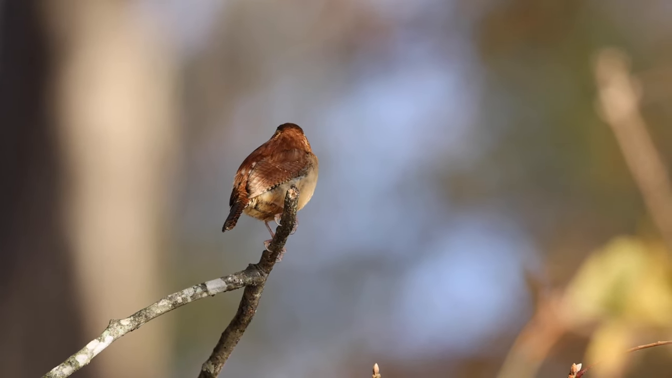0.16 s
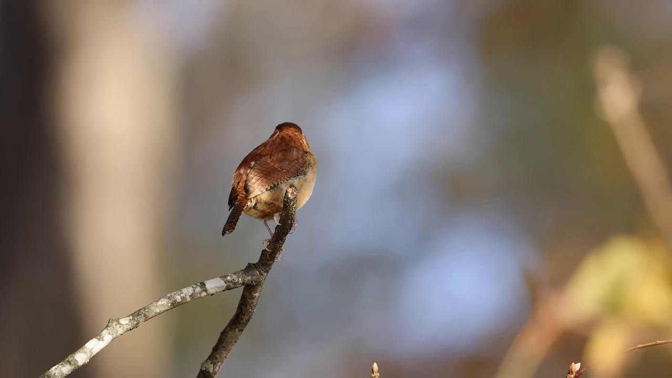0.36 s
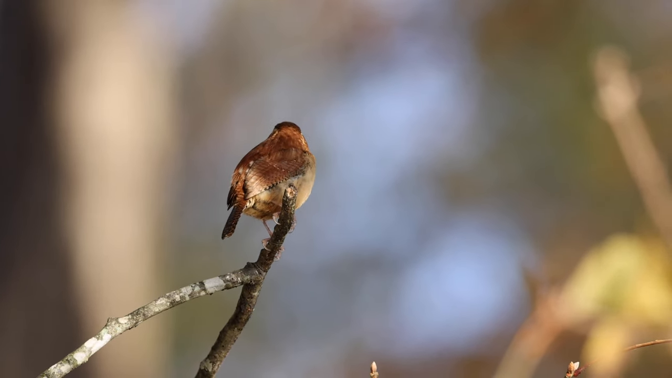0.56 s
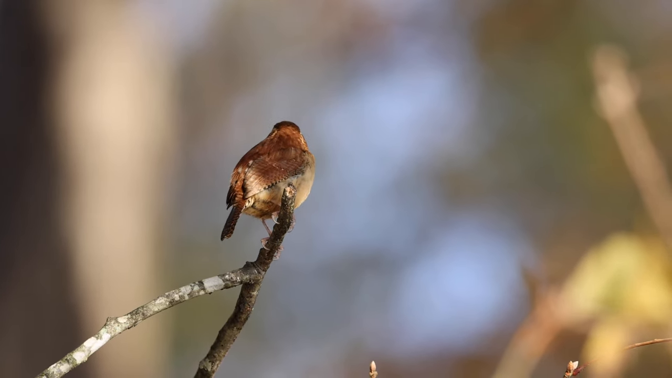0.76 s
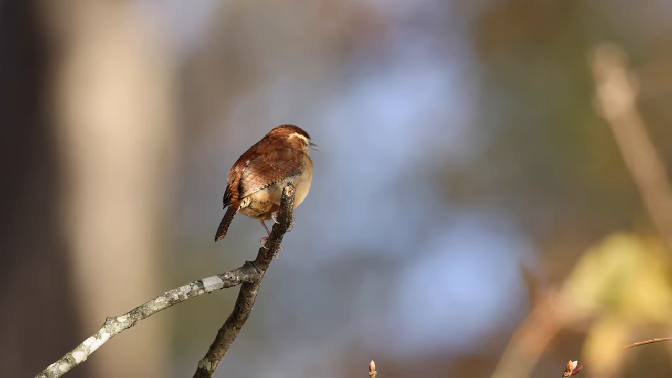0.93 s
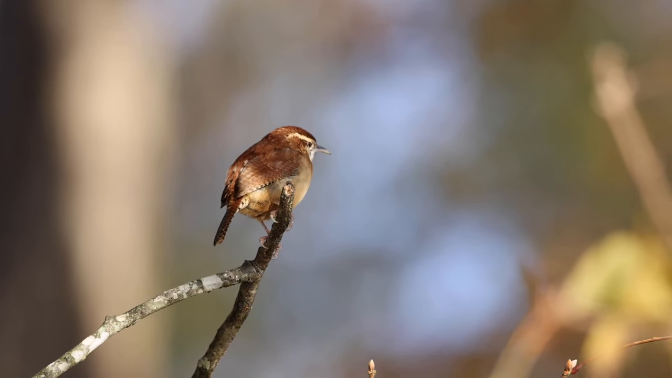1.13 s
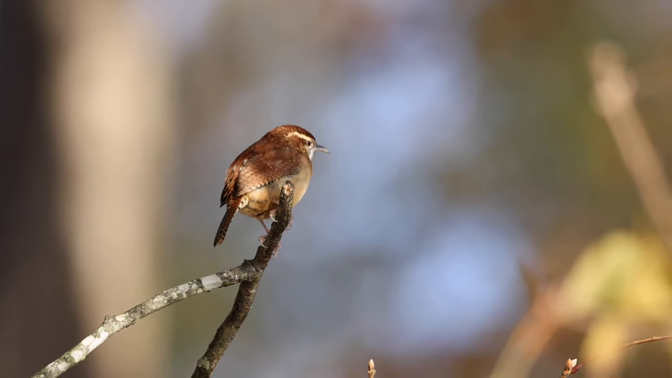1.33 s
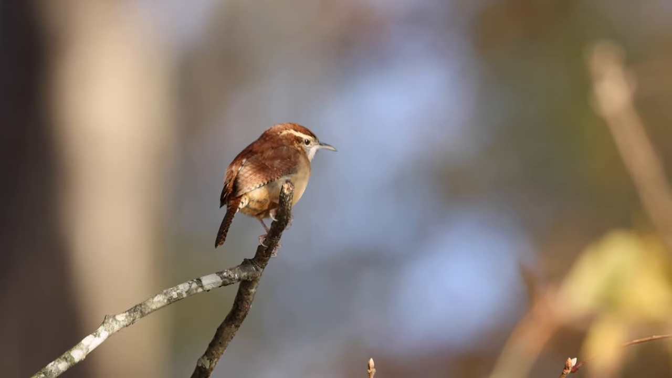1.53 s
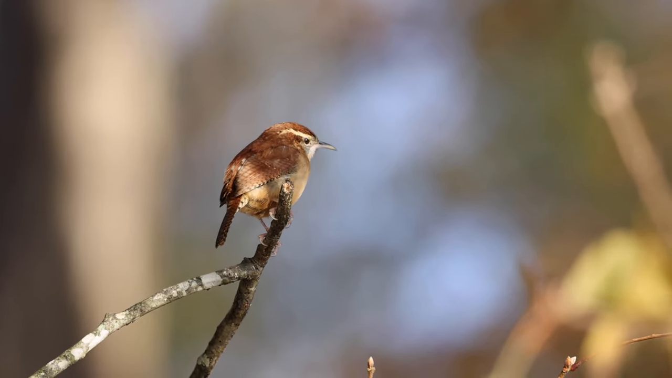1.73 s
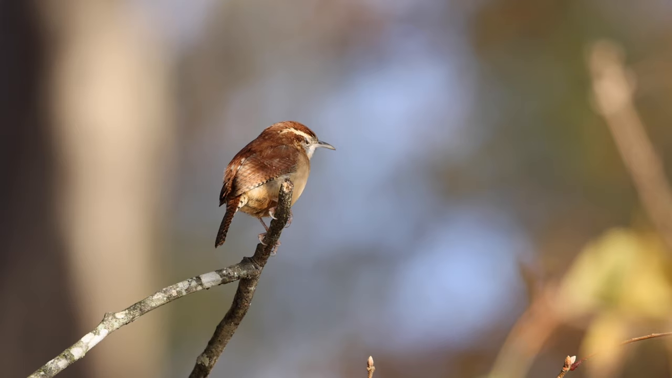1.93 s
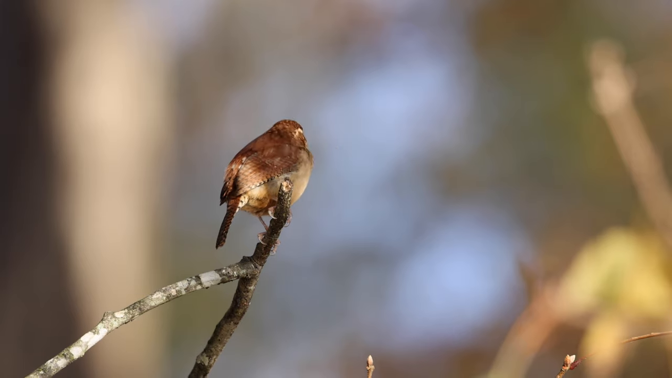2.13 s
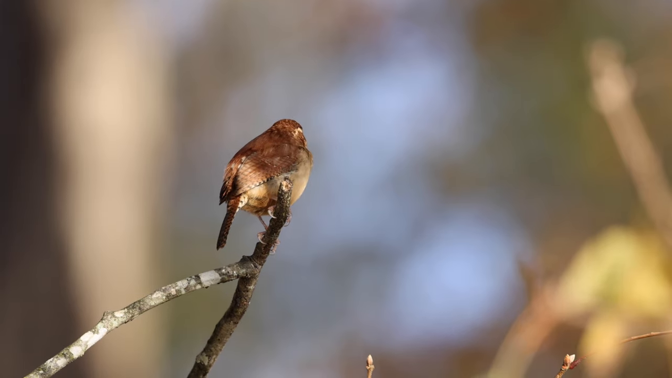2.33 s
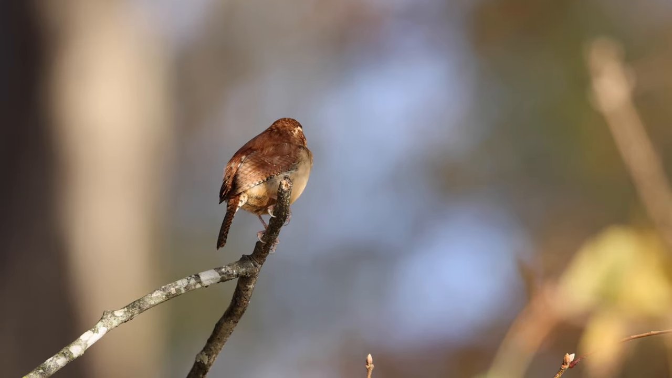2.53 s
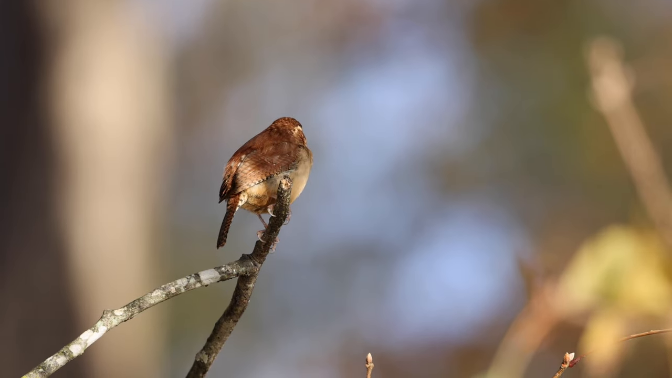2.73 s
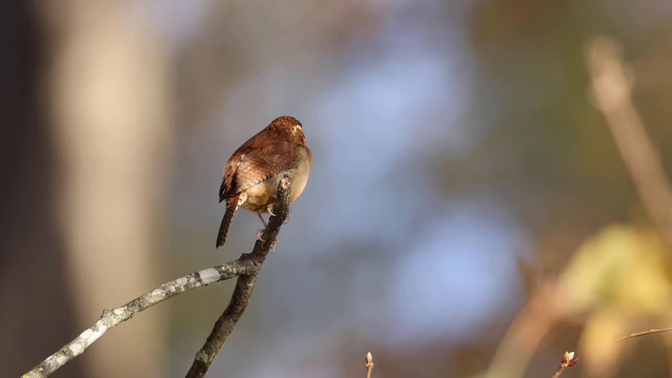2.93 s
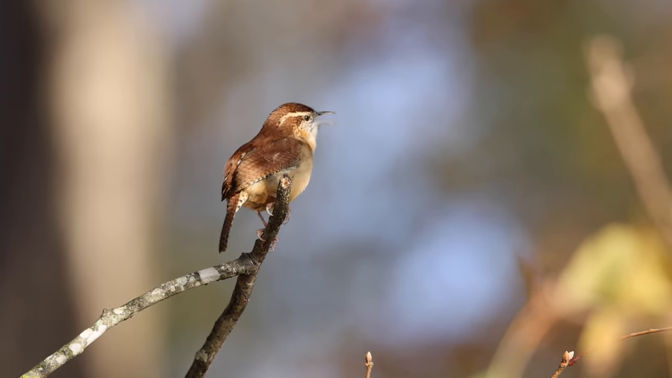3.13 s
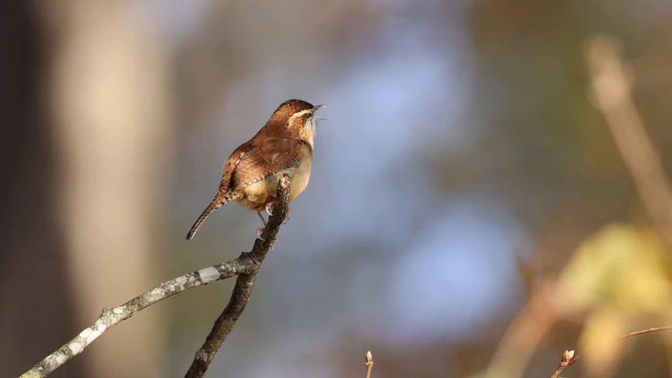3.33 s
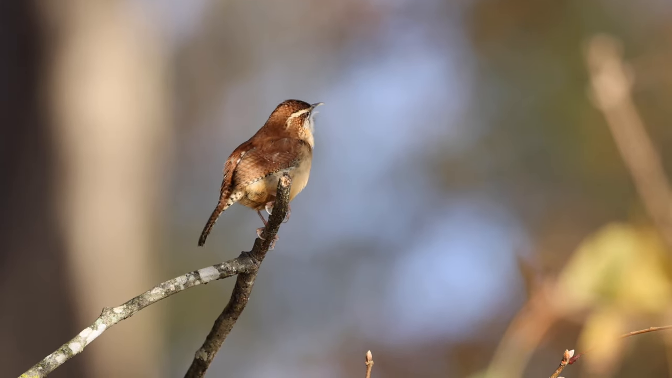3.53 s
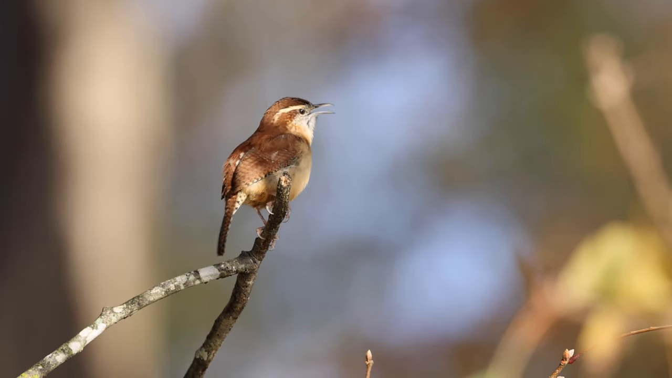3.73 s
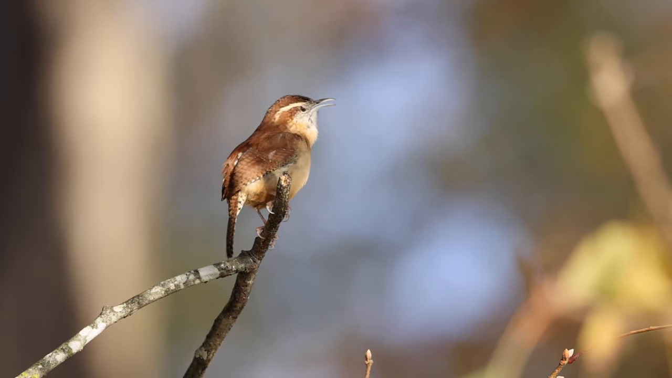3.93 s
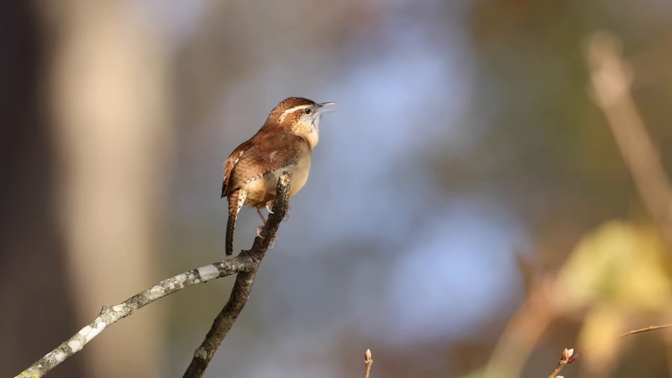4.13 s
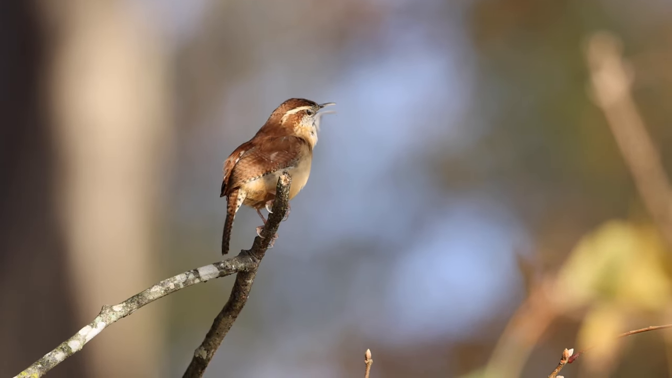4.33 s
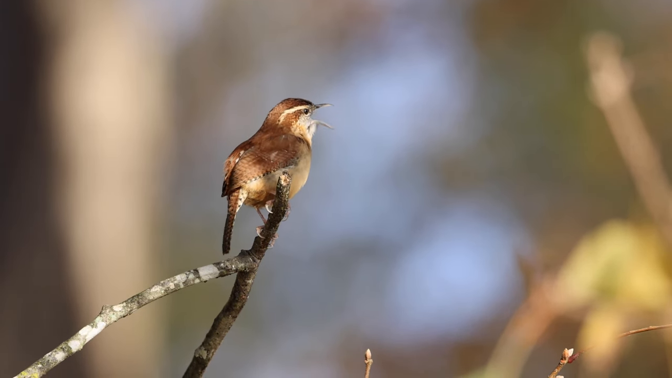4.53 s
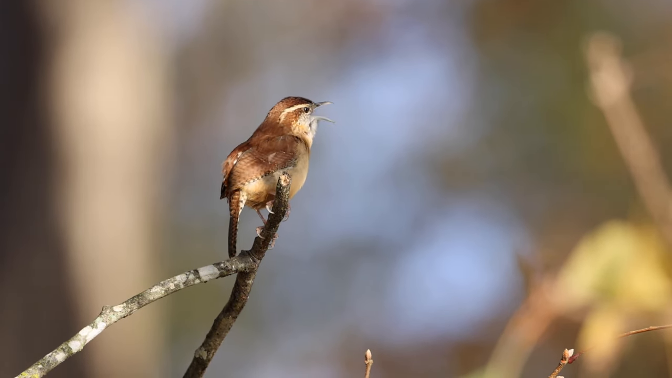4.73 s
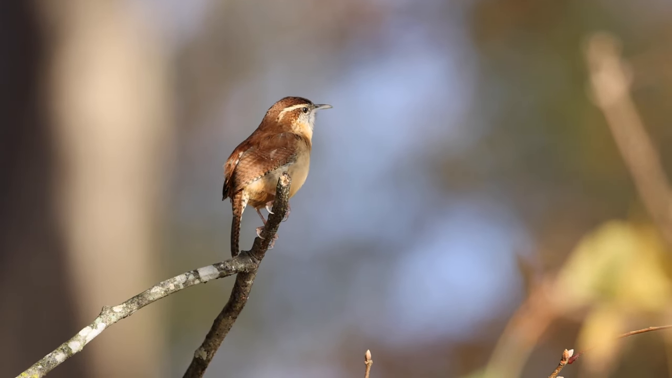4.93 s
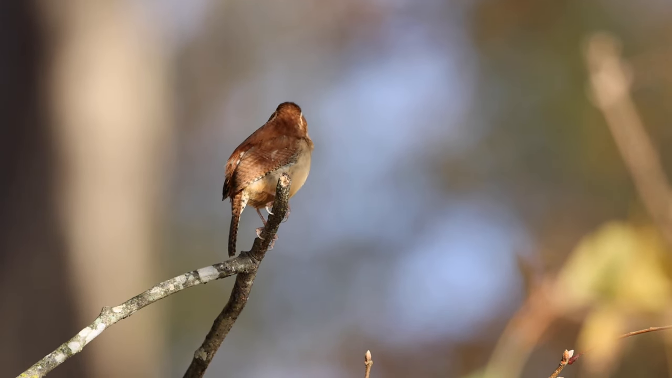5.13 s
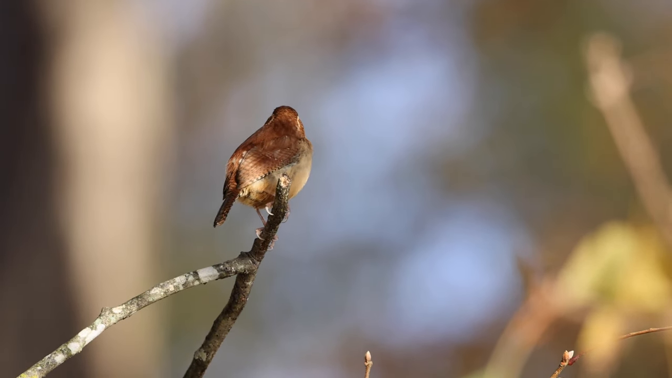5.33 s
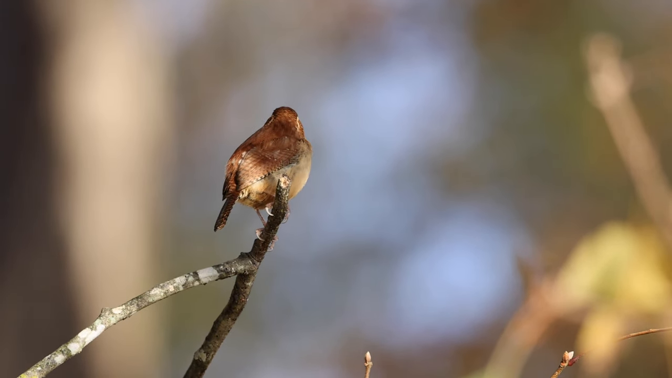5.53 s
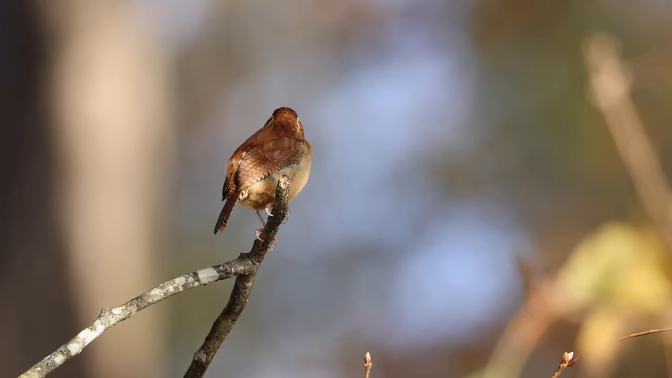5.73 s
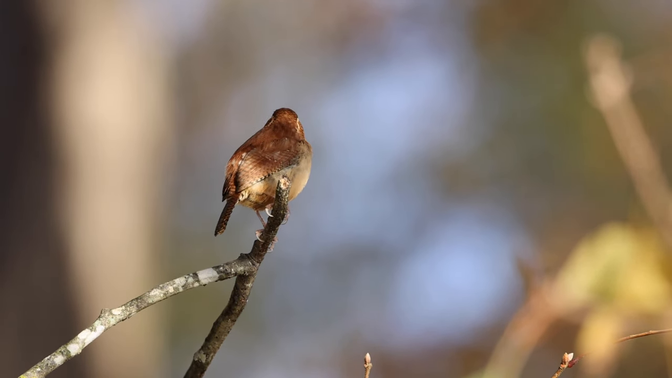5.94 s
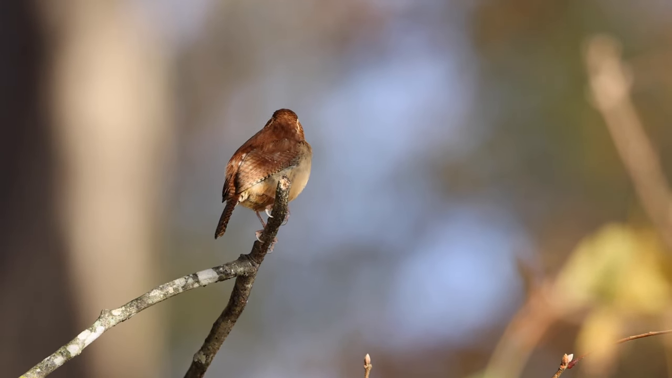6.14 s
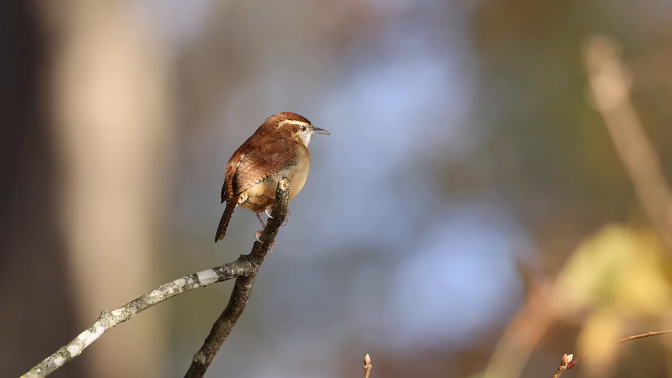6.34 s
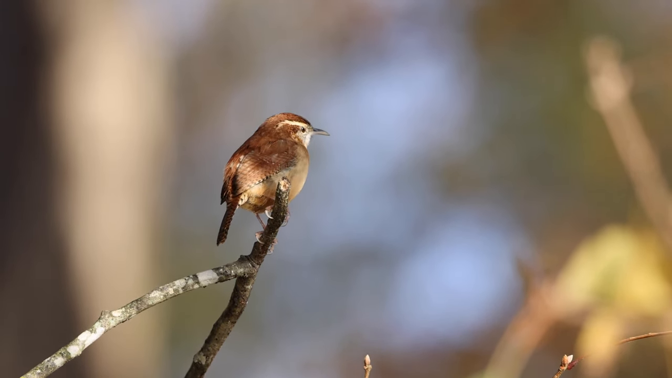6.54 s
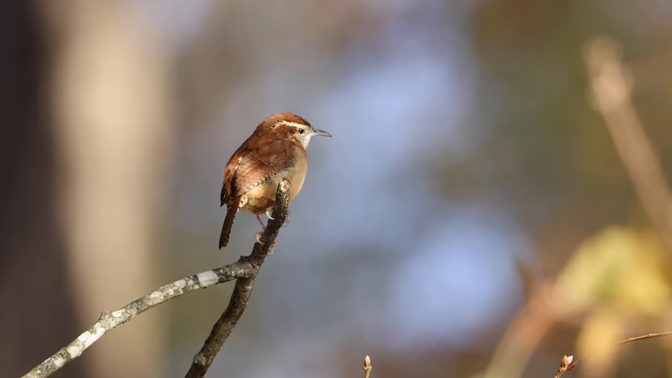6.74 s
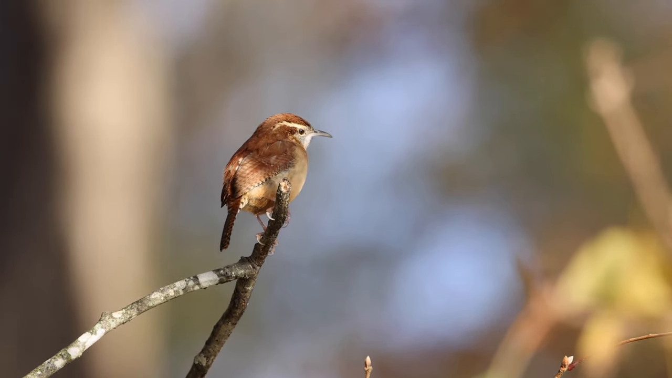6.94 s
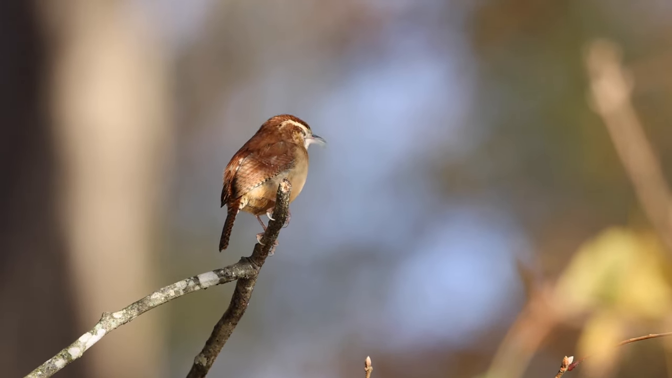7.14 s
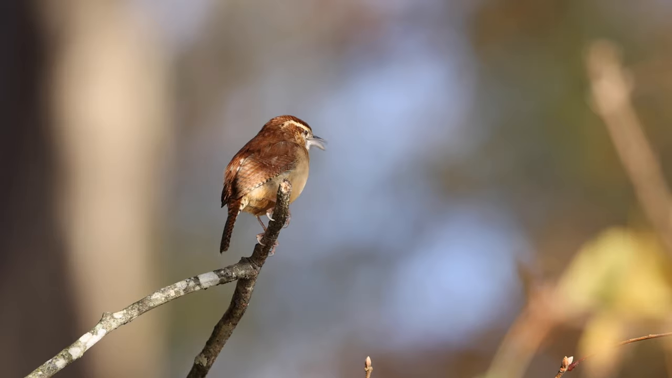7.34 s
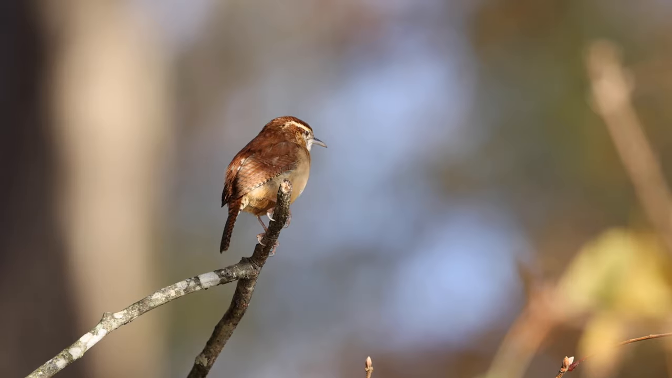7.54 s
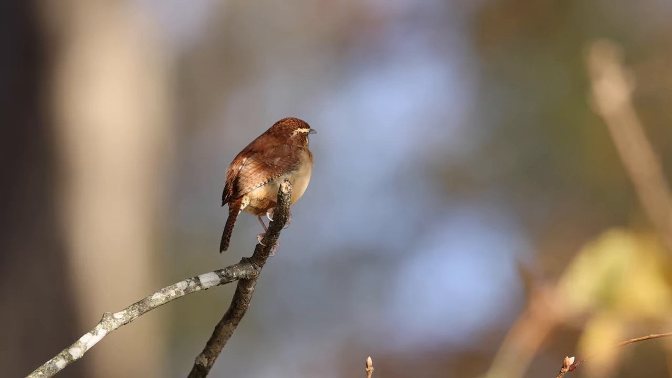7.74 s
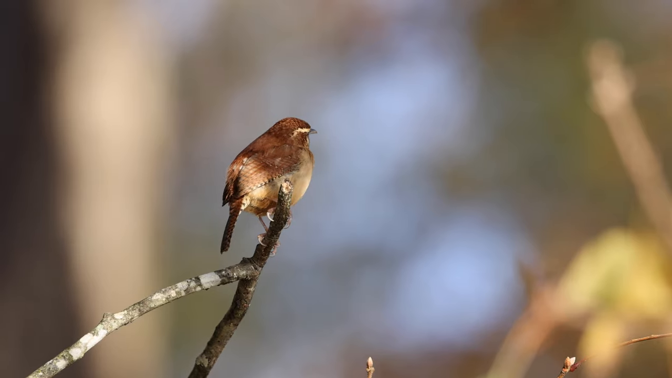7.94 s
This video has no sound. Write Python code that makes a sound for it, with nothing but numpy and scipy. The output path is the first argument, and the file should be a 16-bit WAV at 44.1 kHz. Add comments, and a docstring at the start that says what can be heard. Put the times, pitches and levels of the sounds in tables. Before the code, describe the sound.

A quiet wood, with a low rumble of distant traffic and a faint hum throughout. The echo of a wren's song dies away at the very start. From 0.5 to 2.4 seconds two far songbirds softly repeat whistled phrases, one slow and low, the other quicker. Thin single calls and very faint dry leaf rustles are scattered all along. From 3.2 to 4.9 seconds a wren a few metres away sings five quick, identical gliding phrases, by far the loudest sound, echoing off the trees. From 3.9 to about 4.9 seconds a distant bird adds a soft, raspy chatter that swells, slows and fades. Near 6 seconds a third far songbird begins a fast repeated phrase, lasting until 7.2 seconds. The quicker of the earlier singers joins it from about 6.2 to 7.7 seconds.

```python
"""A wood, with distant traffic and a hum throughout. A wren's echo dies away at the start; from 0.5 s
two far songbirds whistle, and thin single calls and leaf rustles come and go until the end.
From 3.2 to 4.9 s the wren, on a branch a few metres off, whistles five phrases that the ground and
trees echo; a raspy bird chatters from 3.9 s. Near 6 s a third far songbird starts, then one of the
first two returns."""
import sys
import numpy as np
from scipy import signal
from scipy.fft import rfft, irfft, next_fast_len
from scipy.io import wavfile
from scipy.ndimage import uniform_filter1d

SR = 44100
rng = np.random.default_rng(int(sys.argv[2]) if len(sys.argv) > 2 else 0)


def to_wav(sig):
    """Store sig (one row per channel, or 1-D mono) as 16-bit WAV at the path in sys.argv[1].

    Samples outside -1..1 are clipped; the rate is SR.
    """
    pcm = np.clip(np.atleast_2d(sig), -1, 1) * 32767
    pcm = np.round(pcm).astype(np.int16)
    wavfile.write(sys.argv[1], SR, pcm.T)  # frames by channels


N = 355867
WIDE = next_fast_len(N + SR)  # about a second before zero is played too, so its echoes still ring
LEAD = WIDE - N

# The four notes of a wren phrase: t/ms, f/Hz, level/dB
ZIP_NOTE = [(11, 1400, -33), (18, 2500, -27), (23, 3450, -22), (25, 3850, -12), (30, 3300, -8)]
CHIP_NOTE = [(45, 2530, -14), (52, 2600, -10), (59, 2700, -2)]
ARCH_NOTE = [(79, 3650, -14), (85, 4040, -8), (91, 4200, -6), (98, 4250, -6), (110, 4090, -4),
             (119, 3600, -2), (125, 3240, -3), (134, 3060, -5)]
HOLD_RISE_NOTE = [(186, 2275, -10), (196, 2270, -7), (214, 2232, -6), (238, 2232, -10.5), (250, 2390, -3),
                  (260, 2630, -4), (271, 2850, -1), (288, 3100, 4.5), (300, 3370, -8)]
# One phrase a row: t/s of arch, hold and rise, level/dB of arch, hold, rise and zip,
# pitch shift/%, end cut short/ms, ground echo delay/ms
WREN_PHRASES = [(-.312, -.222, -.137, -31, -30, -28, -32, -.3, .1, 4.16),
                (3.2871, 3.3774, 3.4672, -27.5, -24, -23, -32, 1.5, .1, 4.17),
                (3.6388, 3.7281, 3.8144, -23, -22.5, -21, -24, .6, .1, 4.17),
                (3.9830, 4.0728, 4.1581, -20.5, -22, -20.5, -20.5, -.3, .1, 4.17),
                (4.3233, 4.4170, 4.5059, -20.5, -20.5, -21, -20.5, -1.1, 6, 4.16),
                (4.6779, 4.7752, 4.8576, -21, -21, -22, -23, -1.5, 5, 4.14)]
# Tones above the whistle: multiple of its pitch, level/dB, level/dB on the arch (beak wide open)
WREN_OVERTONES = [(2, -50, -39), (3, -52, -43), (4, -49, -60), (5, -45, -60), (6, -46, -60)]
# How loud the overtones sound at each pitch: f/Hz, level/dB
OVERTONE_COLOUR = [(4000, -6), (5500, 0), (7000, -6), (8400, .5), (9400, -14), (11000, -9), (12800, 4),
                   (15500, -.5)]
# Echoes off trunks and a wall: delay/ms, level/dB
HARD_ECHOES = [(1.1, -15), (2.7, -12), (20.9, -22), (138.5, -25)]

def wren():
    """A gliding whistle with weak overtones; the ground's echo boosts and cancels it as it glides."""
    middles_ms = (105, 195, 280)  # of arch, hold and rise
    attack_ms, release_ms = 4.2, 3.8
    zip_bright_db, zip_rolloff_db, zip_rasp = 51, 13, 2.5
    notes = [np.transpose(note) for note in (ZIP_NOTE, CHIP_NOTE, ARCH_NOTE, HOLD_RISE_NOTE)]
    path_ms, path_hz, _ = np.hstack(notes)
    loudest_arch_db = np.max(WREN_PHRASES, axis=0)[3]
    t = np.arange(SR // 2) / SR
    out = np.zeros(WIDE)
    for row in WREN_PHRASES:
        times, levels_db, (zip_db, shift_percent, cut_ms, echo_ms) = row[:3], row[3:6], row[6:]
        start = times[0] - middles_ms[0] / 1000
        end = times[2] + (500 - middles_ms[2]) / 1000
        # stretch the notes to this phrase's timing
        place_ms = np.interp(start + t, [start, *times, end], [0, *middles_ms, 500])
        shift = np.interp(place_ms, [60, 90, 240, 265], [0, 1, 1, 0]) * shift_percent / 100
        pitch = uniform_filter1d(np.interp(place_ms, path_ms, path_hz) * (1 + shift), size=130)
        effort_db = np.interp(place_ms, [ZIP_NOTE[-1][0], CHIP_NOTE[0][0], *middles_ms],
                              [zip_db, levels_db[0], *levels_db])
        shape = sum(np.interp(place_ms, [at[0] - attack_ms, *at, at[-1] + release_ms], [0, *undb(db), 0])
                    for at, _, db in notes)
        shape *= np.clip((path_ms[-1] + release_ms - cut_ms - place_ms) / release_ms, 0, 1)
        gain = np.sqrt(2) * undb(effort_db) * uniform_filter1d(shape, size=40)
        in_zip = np.interp(place_ms, [22, 26], [1, 0])  # the zip starts bright and rough, then clears
        in_arch = place_ms > CHIP_NOTE[-1][0] + release_ms
        in_arch &= place_ms < HOLD_RISE_NOTE[0][0] - attack_ms
        phase = 2 * np.pi * np.cumsum(pitch) / SR
        tone = np.sin(phase)
        rasp = .12 * noise_band(0, 220)[:len(t)] + .18 * noise_band(0, 1500)[:len(t)]
        for k, usual_db, arch_db in WREN_OVERTONES:
            level_db = np.where(in_arch, arch_db, usual_db) + db_at(k * pitch, OVERTONE_COLOUR)
            level_db += .25 * (k - 2) * (effort_db - loudest_arch_db)  # louder singing is brighter
            level_db += in_zip * (zip_bright_db - zip_rolloff_db * (k - 2))
            share = undb(level_db) * (shape + .02) ** -.45  # overtones swell less than the whistle
            flutter = 1 + (k - 1 + zip_rasp * in_zip) * rasp
            tone += flutter * share * (k * pitch < .45 * SR) * np.sin(k * phase)
        # the soft ground returns the whistle but not its overtones
        ground_echo = undb(-5) * delayed(gain * np.sin(phase), echo_ms)
        add(out, gain * tone + ground_echo, start)
    return out + sum(undb(db) * np.roll(out, int(ms * SR / 1000)) for ms, db in HARD_ECHOES)


# Each far bird's phrase: t/s, length/ms, first f/Hz, middle f/Hz, last f/Hz, level/dB, roughness (0-1)
RIVAL_PHRASE = [(.008, 32, 2700, 2400, 2250, -8, .1), (.038, 40, 2800, 2420, 2350, 0, .1),
                (.085, 27, 2200, 2400, 2750, -7, .1), (.118, 38, 2200, 2550, 2870, 0, .1),
                (.148, 32, 3650, 3950, 4020, -9, .2), (.183, 30, 3700, 3930, 4000, -14, .1),
                (.217, 22, 4850, 4550, 4450, -15, .1), (.247, 22, 5700, 4750, 4450, -12, .1),
                (.280, 18, 4600, 4500, 4400, -19, .1)]
SLOW_PHRASE = [(-.04, 50, 1700, 1700, 1680, -5, .2), (0, 32, 2250, 2500, 2650, 0, .1),
               (.2, 60, 2400, 2150, 1850, -9, .3)]
DEEP_PHRASE = [(-.008, 28, 2800, 2830, 2880, -1.5, .3), (.022, 26, 2850, 3000, 3050, 0, .3),
               (.05, 80, 3150, 3130, 3150, -7, .7), (.08, 36, 3100, 3950, 4800, -11, .25),
               (.16, 70, 3100, 3150, 3150, -10, .8)]
# Runs of that phrase: first t/s, last t/s, first level/dB, last level/dB, phrases, break-off t/s
RIVAL_RUNS = [(5.921, 7.158, -44, -44, 6, 7.24)]
SLOW_RUNS = [(.535, 1.365, -53, -53, 3, 1.7)]
DEEP_RUNS = [(.688, 1.973, -48.5, -48.5, 6, 2.4), (6.15, 7.445, -50, -51, 6, 7.7)]

def songbirds():
    """Three separate whistlers: a quick rival, a slow low singer and one deep in the wood."""
    return song(RIVAL_PHRASE, RIVAL_RUNS), song(SLOW_PHRASE, SLOW_RUNS), song(DEEP_PHRASE, DEEP_RUNS)


def song(phrase, runs):
    """A bird repeats its phrase at an even pace through each run."""
    rows = []
    for first, last, first_db, last_db, count, stop in runs:
        for start, run_db in np.linspace((first, first_db), (last, last_db), count):
            rows += [(start + t, *path, db + run_db, rough)
                     for t, *path, db, rough in phrase if start + t < stop]
    return whistles(rows)


def whistles(rows):
    """Short tones that bend in pitch; a quick random flutter makes them rough."""
    out = np.zeros(WIDE)
    flutter = noise_band(0, 250) + 1j * noise_band(0, 250)
    for start, ms, first, middle, last, db, rough in rows:
        along = np.linspace(-1, 1, int(ms * SR / 1000))
        pitch = middle + along * (last - first) / 2 + along ** 2 * ((first + last) / 2 - middle)
        voice = 1 - rough + rough * flutter[LEAD + int(start * SR):][:len(along)] / np.sqrt(2)
        wave = np.imag(voice * np.exp(2j * np.pi * np.cumsum(pitch) / SR))
        add(out, np.sqrt(2) * undb(db) * (1 - along ** 2) ** .7 * wave, start)
    return out


# Bands of hiss from the bird's throat: f/Hz, width/Hz, level/dB
THROAT_BANDS = [(5600, 900, 0), (6800, 1000, -5), (7600, 600, -18)]

def chatter():
    """A scolding bird's harsh puffs, coloured by its throat, swell and fade as they slow down."""
    start_s, puffs, puff_ms, gap_ms, slowing_ms = 3.93, 26, 15, 32.9, 11.1
    rasp = unit(sum(undb(db) * noise_band(hz, width) for hz, width, db in THROAT_BANDS))
    along = np.linspace(0, 1, puffs)
    uneven_time, uneven_level = rng.standard_normal((puffs, 2)).T
    after_ms = (puffs - 1) * (gap_ms * along + slowing_ms * along ** 3 / 3) + 1.5 * uneven_time
    level_db = -46.5 - 45 * (along - .52) ** 2 + .8 * uneven_level  # loudest about halfway
    return bursts(zip(start_s + after_ms / 1000, np.full(puffs, puff_ms), level_db), rasp)


# Kinds of call, by name: length/ms, first and last f/Hz counted from the middle pitch, roughness (0-1)
CALL_SHAPES = {"slur": (95, -30, -250, .2), "fall": (55, 250, -200, .2), "flat": (45, -15, -20, .2),
               "peep": (28, -350, 100, .1), "tseep": (45, -300, -100, .7)}
# The calls: t/s, kind, middle f/Hz, level/dB
CALLS = [(.62, "flat", 3100, -56), (1.15, "peep", 7400, -68), (1.5, "slur", 2700, -57),
         (1.685, "tseep", 7800, -60), (1.72, "slur", 2800, -55), (1.96, "slur", 2750, -55),
         (2.03, "flat", 1950, -60), (2.4, "tseep", 7950, -69), (2.745, "peep", 5600, -66),
         (2.78, "peep", 6250, -61), (2.865, "peep", 6100, -67), (3.012, "peep", 6650, -66),
         (3.125, "peep", 6550, -65), (3.59, "flat", 1700, -56), (4.88, "tseep", 7800, -64),
         (4.99, "peep", 7300, -67), (5.09, "fall", 4450, -62), (5.2, "fall", 2000, -58),
         (5.205, "slur", 2720, -55), (5.425, "slur", 2800, -53), (5.65, "slur", 2740, -54),
         (6.09, "tseep", 7600, -67), (6.35, "fall", 3250, -58), (7.04, "peep", 7900, -67),
         (7.275, "tseep", 7800, -61)]

def single_calls():
    """Birds give thin calls, one short whistle each."""
    rows = []
    for start, kind, hz, db in CALLS:
        ms, first, last, rough = CALL_SHAPES[kind]
        rows.append((start, ms, hz + first, hz, hz + last, db, rough))
    return whistles(rows)


# Stirring leaves: t/s, length/ms, level/dB
LEAF_STIRS = [(.45, 22, -63), (.505, 25, -63), (2.27, 90, -67), (2.60, 30, -63), (2.85, 260, -67),
              (5.5, 20, -67), (7.035, 18, -64), (7.74, 20, -67), (7.78, 20, -66), (7.9, 110, -69)]

def leaves():
    """Dry leaves rustle: bright hiss broken into uneven grains."""
    hiss = noise_band(6000, 2800)
    grains = undb(5 * noise_band(0, 300))
    return bursts(LEAF_STIRS, unit(hiss * grains))


def tree_echo(x):
    """Trunks scatter sound, high pitches best: near echoes die fast, far ones linger."""
    near_fade_s, far_fade_s, scatter_hz = .32, 1.4, (2100, 15000)  # a fade is a fall of 60 dB
    t = np.arange(2 * SR) / SR
    fade = undb(-60 * t / near_fade_s) + undb(-9.5 - 60 * t / far_fade_s)
    tail = rng.standard_normal(len(t)) * fade * np.minimum(t / .006, 1)
    tail /= np.sqrt(np.sum(tail ** 2))
    tail = signal.lfilter(*signal.butter(1, scatter_hz, "band", fs=SR), tail)
    return signal.fftconvolve(x, tail)[:len(x)]


# The traffic's balance of low and high: f/Hz, level/dB
TRAFFIC_COLOUR = [(30, -35), (50, -8), (100, -5), (160, -8), (250, -10), (450, -15), (800, -10),
                  (1200, -11), (1700, -21), (2200, -26), (3000, -25), (3800, -33), (8000, -45),
                  (15500, -55)]

def traffic():
    """Distant traffic rumbles: octave-wide bands of noise swell together and also drift alone."""
    hz = np.fft.rfftfreq(WIDE, 1 / SR)
    spectrum = rfft(rng.standard_normal(WIDE)) * undb(db_at(hz, TRAFFIC_COLOUR))
    octave = np.log2(np.maximum(hz, 1) / 20)
    swell = drift(.6)
    out = np.zeros(WIDE)
    for k in range(11):
        part = irfft(spectrum * np.clip(1 - np.abs(octave - k), 0, 1), WIDE)
        out += part * undb(.3 * swell + .6 * drift(2.5))
    return undb(-44.5) * unit(out)


# Parts of the hum: f/Hz, width/Hz (ignored for the first, a pure tone), level/dB
HUM_PARTS = [(40.5, 1., -54), (81.5, 4., -57), (120., 5., -57), (240., 4., -64)]

def hum():
    """A machine hums: one low tone wavers in level under narrow bands of noise."""
    low_hz, _, low_db = HUM_PARTS[0]
    gain = np.sqrt(2) * undb(low_db + .8 * drift(8))
    tone = gain * np.sin(2 * np.pi * low_hz * np.arange(WIDE) / SR)
    return tone + sum(undb(db) * noise_band(hz, width) for hz, width, db in HUM_PARTS[1:])


def bursts(rows, noise):
    """Noise let through in smooth puffs; each row is middle t/s, length/ms, level/dB."""
    gate = np.zeros(WIDE)
    for middle, ms, db in rows:
        along = np.linspace(-3, 3, int(3 * ms * SR / 1000))
        add(gate, undb(db) * np.exp(-along ** 2), middle - 1.5 * ms / 1000)
    return noise * gate


def noise_band(hz, width):
    """Noise that is strongest at hz and fades to either side."""
    offset = np.fft.rfftfreq(WIDE, 1 / SR) - hz
    bell = np.exp(-(offset / width) ** 2) * (np.abs(offset) < 3 * width)
    spectrum = rng.standard_normal((len(offset), 2)) @ [1, 1j]
    return unit(irfft(spectrum * bell, WIDE))


def drift(steps_per_s):
    """A slow random wander, mostly between -1 and 1."""
    steps = uniform_filter1d(rng.standard_normal(200), size=2) * np.sqrt(2)
    return np.interp(np.arange(WIDE) * steps_per_s / SR, np.arange(200), steps)


def undb(db):
    """Turn decibels into a multiplier."""
    return 10 ** (np.asarray(db, float) / 20)


def unit(x):
    """Scale x to an average strength (rms) of 1."""
    return x / np.sqrt(np.mean(x ** 2))


def db_at(hz, table):
    """Read the level at hz off a table of f/Hz, level/dB."""
    table_hz, table_db = np.transpose(table)
    return np.interp(np.log(np.maximum(hz, 1)), np.log(table_hz), table_db)


def add(out, x, start_s):
    """Mix x into out at start_s."""
    i = LEAD + int(start_s * SR)
    out[i:i + len(x)] += x[:len(out) - i]


def delayed(x, ms):
    """x later by ms; its end must be silent."""
    hz = np.fft.rfftfreq(len(x), 1 / SR)
    return irfft(rfft(x) * np.exp(-2j * np.pi * hz * ms / 1000), len(x))


def scene():
    """Mix it all; the deeper in the wood a bird is, the more of its sound arrives as echo."""
    near = wren()
    rival, slow_singer, deep_singer = songbirds()
    far = rival + slow_singer + single_calls() + leaves()
    deep = deep_singer + undb(-2.5) * chatter()
    direct = near + far + undb(-2.5) * deep
    echo = tree_echo(undb(-9.5) * near + undb(-6) * far + undb(3.5) * deep)
    return (direct + echo + traffic() + hum())[None, LEAD:]


def record(dry):
    """A steep filter cuts the highest treble."""
    top_hz = 15520
    return signal.sosfilt(signal.ellip(10, .2, 80, top_hz, fs=SR, output="sos"), dry)


dry = scene()
out = record(dry)
to_wav(out)
```